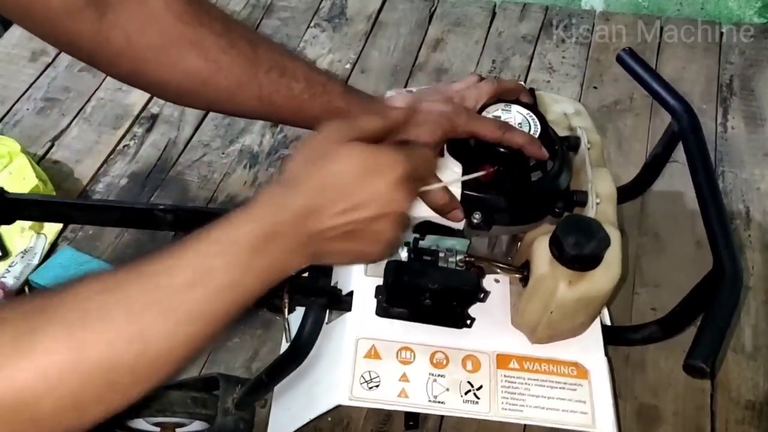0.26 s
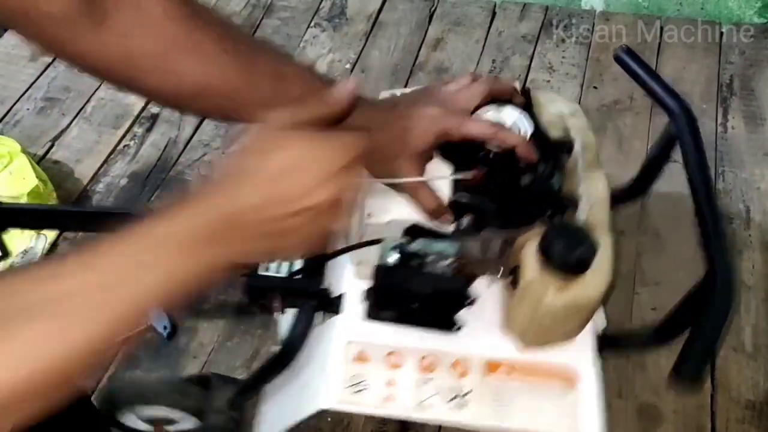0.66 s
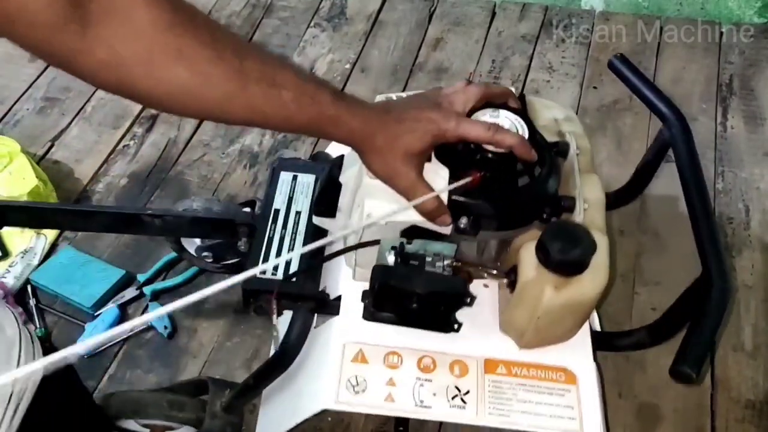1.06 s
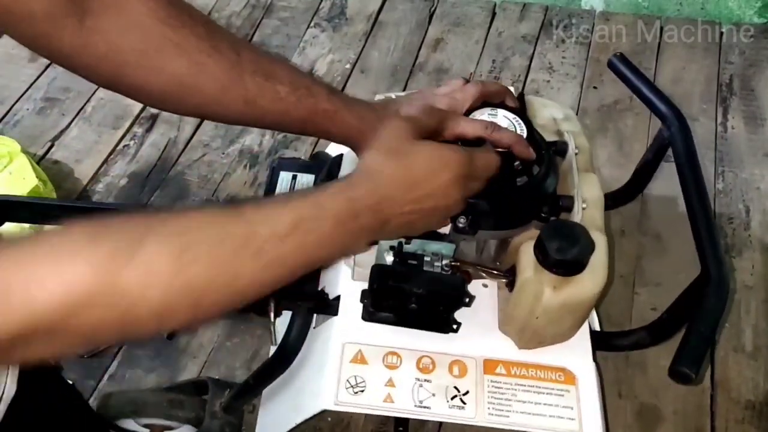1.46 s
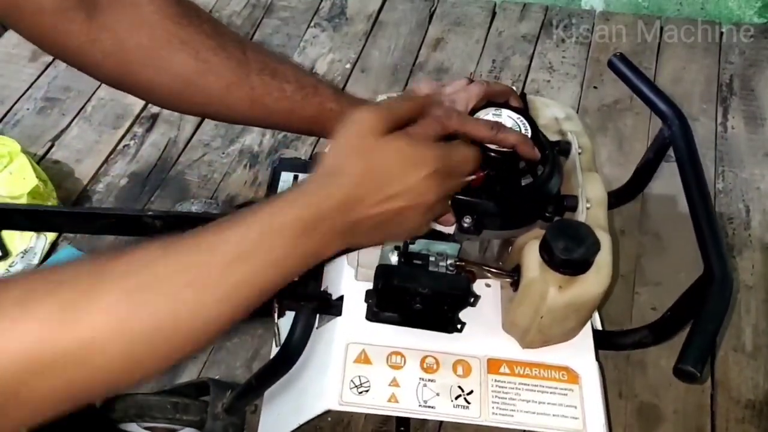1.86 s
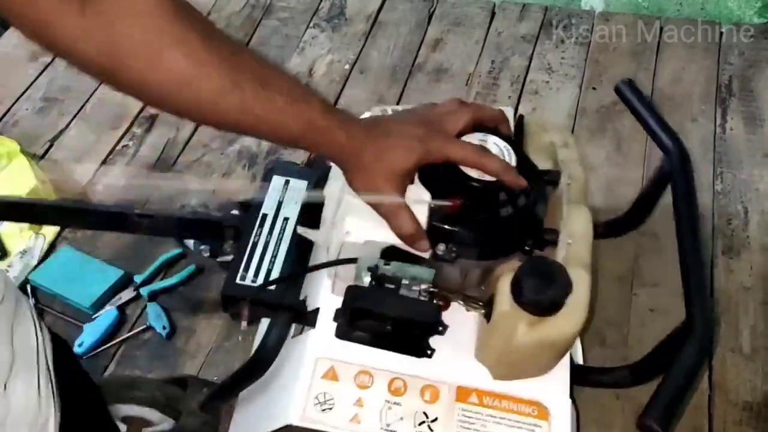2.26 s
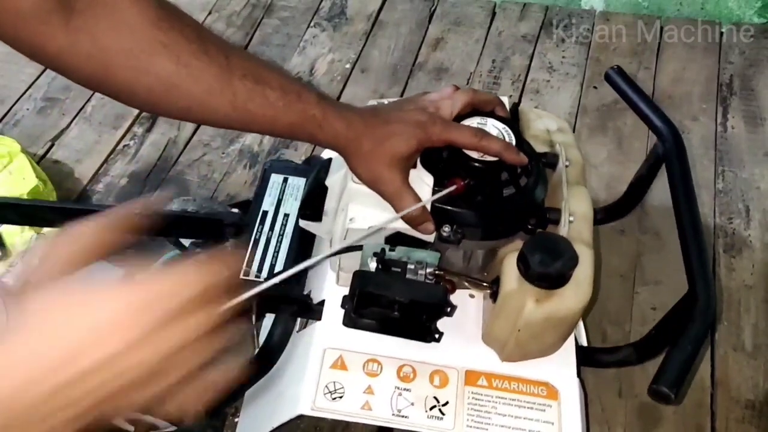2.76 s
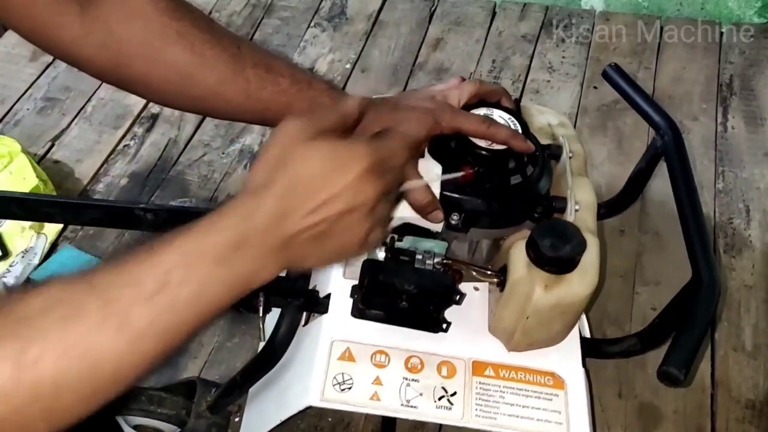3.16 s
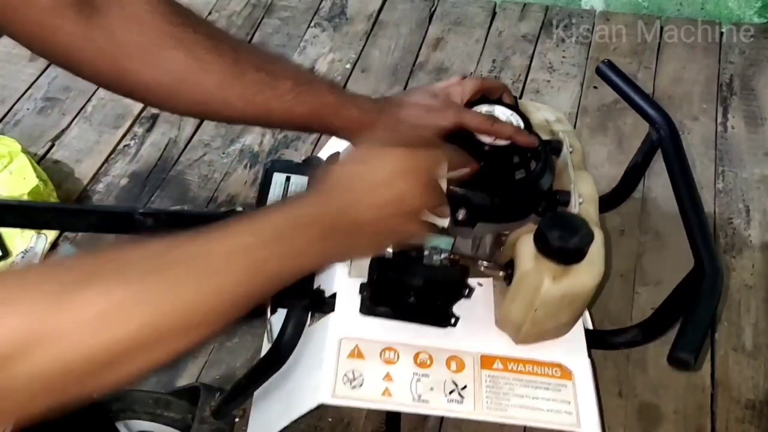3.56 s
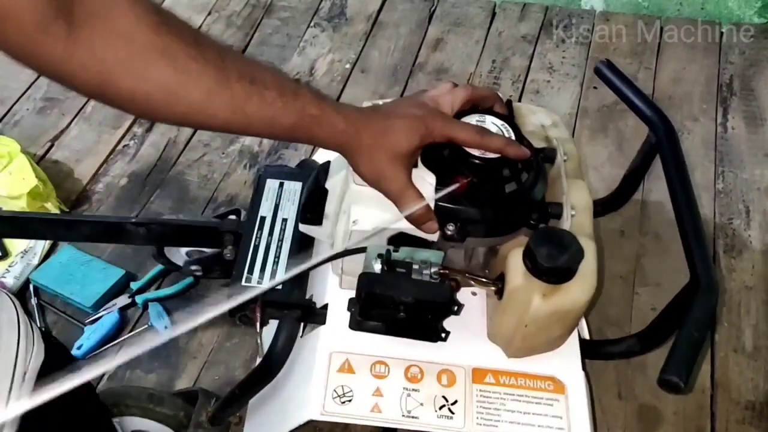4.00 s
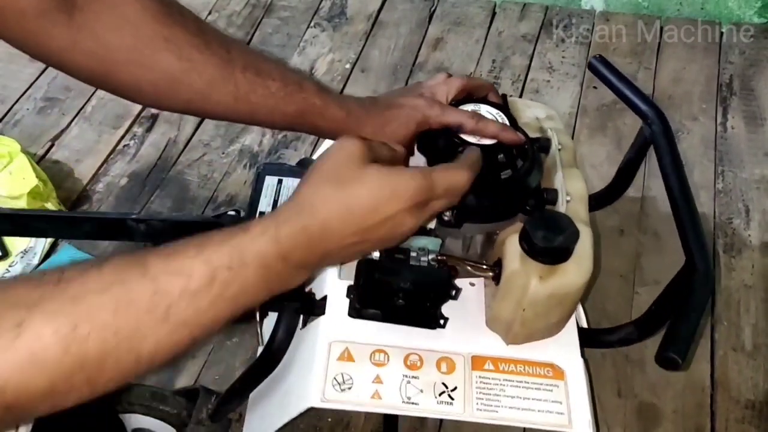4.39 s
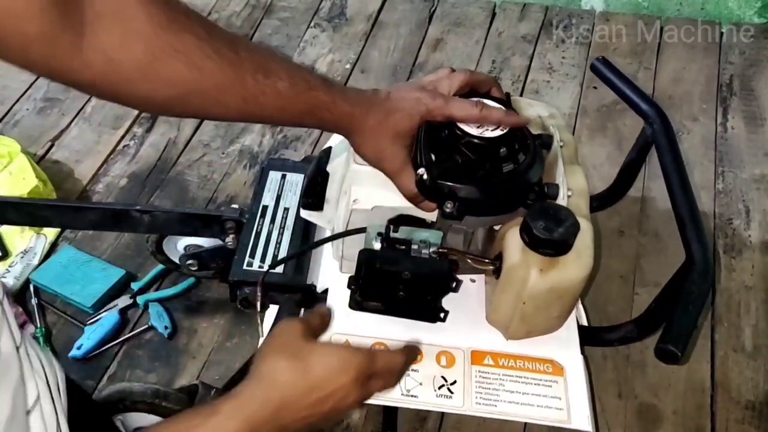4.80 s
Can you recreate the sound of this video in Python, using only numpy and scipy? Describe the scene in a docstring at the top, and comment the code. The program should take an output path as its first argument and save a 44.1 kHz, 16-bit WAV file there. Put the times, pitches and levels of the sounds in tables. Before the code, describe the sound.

Three hard rope pulls crank a small engine with quick popping thumps, rope hiss and loose rattles, ending in a sharp handle clack.

```python
"""In a workshop, a hand pulls the starter rope of a small two-stroke engine three times; it never fires.
Each puff of air is a pop and a thump, short swings of pressure that ring the frame.
Shaped noise gives the rope hiss, rattle and brushing reel; narrow noise gives the reel's squeal.
Pawl, handle and loose parts knock and rattle in the housing, as noise and clicks through ringing modes.
The tail of an earlier pull rings out at the start; the handle snaps home at the end."""
import sys
import numpy as np
from scipy import signal
from scipy.fft import rfft, irfft, next_fast_len
from scipy.io import wavfile
from scipy.ndimage import uniform_filter1d

SR = 44100
rng = np.random.default_rng(int(sys.argv[2]) if len(sys.argv) > 2 else 0)


def generate_wav(signal):
    """Clip the signal to [-1, 1] and save it as 16-bit WAV at the path in sys.argv[1]."""
    frames = np.transpose(np.atleast_2d(signal))
    scaled = np.clip(frames, -1, 1) * 32767
    pcm = np.round(scaled).astype(np.int16)
    wavfile.write(sys.argv[1], SR, pcm)


N = 222207  # length in samples


def amp(db):
    """Decibels to linear gain."""
    return 10 ** (np.asarray(db) / 20)


def evened(x):
    """Brings a sound to an RMS of one."""
    return x / np.sqrt(np.mean(x ** 2) + 1e-20)


def read(points, hz):
    """Reads a curve at any frequency, on a logarithmic frequency axis."""
    f, value = np.transpose(points)
    return np.interp(np.log(hz + 1), np.log(f + 1), value)


def add(mix, start_s, sound):
    """Lays a sound into the mix, cut off at the end."""
    part = mix[..., round(start_s * SR):][..., :sound.shape[-1]]
    part += sound[..., :part.shape[-1]]


def times(seconds):
    """Sample times [s] from zero."""
    return np.arange(round(seconds * SR)) / SR


def colour(x, points):
    """Shapes a sound by a spectrum in dB."""
    size = next_fast_len(x.shape[-1])
    gain = amp(read(points, np.fft.rfftfreq(size, 1 / SR)))
    return irfft(rfft(x, size) * gain, size)[..., :x.shape[-1]]


def ring(modes, seconds):
    """The answer of a body to one click: a sum of decaying sines."""
    t = times(seconds)
    return sum(amp(db - 60 * t / t60) * np.sin(2 * np.pi * hz * t) for hz, db, t60 in modes)


# how alike left and right are: (frequency [Hz], likeness [0-1])
LIKENESS = [(60, 1), (150, 0.96), (300, 0.92), (600, 0.58), (1200, 0.088), (3000, 0.018), (14000, 0.033)]


def spread(left, right):
    """Two unrelated sounds become a pair that is alike in the bass and unlike in the treble."""
    size = next_fast_len(len(left))
    same = np.clip(read(LIKENESS, np.fft.rfftfreq(size, 1 / SR)), 0, 1)
    a, b = rfft(left, size), rfft(right, size)
    return irfft(np.array([a, same * a + np.sqrt(1 - same ** 2) * b]), size)[:, :len(left)]


def gritty(per_s, scatter_db, smooth):
    """Friction: sparse uneven clicks over a share of smooth noise."""
    size = amp(scatter_db * np.minimum(rng.exponential(1, (2, N)), 3.5))
    size = size * rng.choice([-1., 1.], (2, N))
    clicks = size * (rng.random((2, N)) < per_s / SR)
    return spread(*evened(clicks + smooth * rng.standard_normal((2, N))))


# spectrum of the steady background air: (frequency [Hz], relative level [dB])
AIR_SPECTRUM = [(40, -40), (80, -14), (140, 0), (300, 10.5), (600, 0), (1200, -36), (3000, -11),
                (6000, -1.5), (16000, -53)]
AIR_DB = -58


def room_air():
    """Steady background noise, shaped by a spectrum."""
    noise = spread(*rng.standard_normal((2, N)))
    return amp(AIR_DB) * evened(colour(noise, AIR_SPECTRUM))


# how long the workshop echoes: (frequency [Hz], t60 [s])
SHOP_T60 = [(100, 0.83), (300, 0.33), (600, 0.39), (1400, 0.3), (4000, 0.29), (10000, 0.21)]


def shop(x):
    """Room echo: sparse taps of random sign, each band dying at its own speed."""
    taps = np.zeros((2, SR))
    at = np.arange(260, SR - 20, 20) + rng.integers(0, 20, (2, (SR - 261) // 20))
    np.put_along_axis(taps, at, rng.choice([-1., 1.], at.shape), 1)
    hz, t, bands = signal.stft(spread(*taps), SR, nperseg=256)
    bands = bands * amp(-60 * t / read(SHOP_T60, hz)[:, None])
    tail = signal.istft(bands, SR, nperseg=256)[1]
    # level out the echo energy, as long bands would otherwise get more
    size = next_fast_len(tail.shape[1])
    tail = irfft(rfft(tail, size) / np.sqrt(read(SHOP_T60, np.fft.rfftfreq(size, 1 / SR))), size)
    return signal.fftconvolve(x[None], tail / np.linalg.norm(tail[0]), axes=1)[:, :N]


# the reel brushes its cover: (time [s], length before the fade [s], level [dB])
SCRAPES = [(0.24, 0.033, -45.5), (0.707, 0.058, -41.5), (1.18, 0.061, -35), (1.534, 0.042, -28),
           (1.606, 0.044, -33.5), (1.758, 0.061, -41.5), (2.194, 0.04, -63), (3.018, .04, -48),
           (3.103, 0.066, -35.5), (3.212, 0.045, -33.5), (4.52, 0.035, -37), (4.61, 0.066, -35.5)]
# colour of the brushing: (frequency [Hz], relative level [dB])
SCRAPE_SPECTRUM = [(2500, -2), (4000, -2.5), (5500, 0.5), (6800, 2), (9000, -7.5), (13000, -5.5),
                   (16000, 5)]


def brushing():
    """The reel brushes its cover in short swells of thin hiss."""
    gain, t = np.zeros(N), times(.25)
    for s, length_s, db in SCRAPES:
        fade_db = 580 * np.maximum(t - length_s, 0)
        add(gain, s, amp(db - fade_db) * np.minimum(t / 0.0066, 1))
    return gain * evened(colour(gritty(1800, 3.4, 1.9), SCRAPE_SPECTRUM))


def surges(depth_db=3):
    """A gain that wanders unevenly, from noise smoothed twice over 16 ms."""
    wander = uniform_filter1d(uniform_filter1d(rng.standard_normal(N), size=700), size=700)
    return amp(depth_db * evened(wander))


def jolts():
    """A gain that jumps around each pop, when the engine shakes everything loose."""
    out, t = np.ones(N), times(.06)
    for s, *_ in PUFFS:
        add(out, max(s - .004, 0), 0.41 * np.exp(-t / 0.0062) * (1 - np.exp(-t / 0.0043)))
    return out


RATCHET_PER_S = 260


def ratchet():
    """Sparse taps of loose parts, each at the pitch of one or two upper modes of the housing."""
    size = amp(5.0 * np.minimum(rng.exponential(1, N), 3)) * (rng.random(N) < RATCHET_PER_S / SR)
    modes = [m for m in HOUSING if m[0] > 720]
    spot, side = rng.integers(0, len(modes), (2, N)), rng.random(N)
    pair = np.array([size * side, size * (1 - side)])
    taps = np.zeros((2, N))
    for k, (hz, *_) in enumerate(modes):
        struck = pair * (spot == k).any(0)  # either of two draws may pick this mode
        taps += signal.fftconvolve(struck, ring([(hz, 0, .014)], .05)[None])[:, :N]
    return evened(taps)


# one row a pull: (time the pawl bites [s], slack before the crank gives [s], time driven [s],
#   coasting fade against the usual [ratio], then relative strength of rope, loose parts, frame [dB])
PULLS = [(-.3, 0.054, 0.22, 0.95, 0, -1.5, 0.76), (1.134, 0.088, 0.24, 0.91, 2, -3, .2),
         (2.643, 0.061, 0.23, 0.85, 1.5, 2.5, 2.8), (4.106, 0.046, 0.3, 0.93, 0.5, -3.5, 0.37)]
BITE_S, GIVE_S = 0.048, 0.059  # rise as the pawl bites, rise as the crank gives


def pulled(driven_db, slack_db, rest_db, fade_db_per_s, rewind_db, rewind_db_per_s, order):
    """Gain of a rubbing part: low on the slack, full while driven, fading as it coasts and rewinds."""
    t, out = np.arange(N) / SR, amp(rest_db) * np.ones(N)
    for bite, slack, driven, brake, *strength_db in PULLS:
        give = np.clip((t - bite - slack) / GIVE_S, 0, 1)
        coast = brake * np.maximum(t - bite - slack - driven, 0)
        level_db = slack_db + (driven_db - slack_db) * give - fade_db_per_s * coast
        both = amp(level_db) + give * amp(rewind_db - rewind_db_per_s * coast)
        out += np.clip((t - bite) / BITE_S, 0, 1) * amp(strength_db[order]) * both
    return out


# colour of the rope over its guide: (frequency [Hz], relative level [dB])
HISS_SPECTRUM = [(1500, 10.5), (2500, 7.5), (3300, 6), (3900, 2.5), (4500, 6), (5800, 3), (6500, 6),
                 (7200, 3), (9000, 0), (12000, -2.5), (16000, 7)]
# colour of the loose parts, before the housing rings: (frequency [Hz], relative level [dB])
RATTLE_SPECTRUM = [(250, -47), (500, 8), (900, 6), (1500, 1.5), (2000, -10), (3000, -48), (5000, -40)]
# usual levels of rope, loose parts and shaking frame, one row each:
# (driven [dB], on the slack [dB], at rest [dB], coasting fade [dB/s], rewind [dB], rewind fade [dB/s])
ROPE_LEVELS = (-28.5, -36.5, -55, 67.5, -45.5, 66)
PARTS_LEVELS = (-30.5, -45, -55, 58.5, -42.5, 56)
SHAKE_LEVELS = (-21.5, -53, -57.5, 65, -43, 43)
RATCHET_DB = -9.5  # against the rattle


def rubbing():
    """Friction noise: rope over its guide, loose parts in the housing, and the frame shaking."""
    hiss = evened(colour(gritty(1500, 3.1, 1.56), HISS_SPECTRUM))
    rattle = colour(gritty(450, 1.05, 0.64), RATTLE_SPECTRUM)
    housing = signal.fftconvolve(rattle, ring(HOUSING, .2)[None])[:, :N]
    rattle = evened(rattle + amp(-41.5) * housing) + amp(RATCHET_DB) * ratchet()
    rumble = evened(signal.fftconvolve(gritty(300, 3.5, 0.3), ring(FRAME, .6)[None])[:, :N])
    jolt = jolts()
    rope = pulled(*ROPE_LEVELS, order=0) * hiss * jolt ** 0.36
    parts = pulled(*PARTS_LEVELS, order=1) * rattle * jolt * surges()
    return rope + parts + pulled(*SHAKE_LEVELS, order=2) * rumble


# the reel chirps on its post: (time [s], level [dB])
SQUEALS = [(1.232, -20), (1.286, -11.5), (1.331, -15), (1.346, -31), (1.375, -12), (1.390, -28),
           (1.422, -21), (1.455, -28), (4.192, -21.5), (4.288, -13.5), (4.314, -11), (4.340, -21),
           (4.370, -17), (4.405, -36)]
SQUEAL_HZ, SQUEAL_RISE_S, SQUEAL_T60_S = 13300, 0.0071, 0.14


def squeal():
    """A dry bearing sticks and slips: short bursts of narrow noise at one high pitch, nearer the left."""
    slip, t = np.zeros(N), times(.3)
    for s, db in SQUEALS:
        add(slip, s, amp(db - 60 * t / SQUEAL_T60_S) * (1 - np.exp(-t / SQUEAL_RISE_S)))
    pole = np.exp(-np.pi * 170 / SR)  # a narrow low-pass, then moved up to the squeal's pitch
    a, b = signal.lfilter([1], np.poly([pole, pole]), rng.standard_normal((2, 2, N)))
    carrier = np.exp(2j * np.pi * SQUEAL_HZ * np.arange(N) / SR)
    tone = evened(((a + 1j * b) * carrier).real * [[1], [.6]]) * slip
    return np.array([tone[0], tone[1] - 0.34 * tone[0]]) * amp([[1.0], [-4]])


# the pawl catches the metal cup:
# (time [s], level [dB], time until the cup is held still [s], extra on modes over 4 kHz [dB])
CATCHES = [(0.621, -46, 0.022, 0), (.645, -43, .02, -4), (0.6658, -36, 0.145, -9), (1.1353, -47, 0.08, -4),
           (2.1474, -44, 0.02, -4), (2.1674, -34.5, 0.13, -8), (3.631, -40, 0.03, 2),
           (3.6626, -33.5, 0.145, -1)]
# modes of the cup: (frequency [Hz], relative level [dB], t60 [s])
CUP_MODES = [(2580, 2, .11), (3343, 0, .38), (3352, -3.5, .22), (4490, -6, .45), (5992, -5, .14),
             (9335, -3, .1)]


def cup():
    """The metal cup rings after each catch until a touch damps it."""
    out, t = np.zeros(N), times(.4)
    for s, db, held_s, top_db in CATCHES:
        modes = [(hz, mode_db + top_db * (hz > 4000), t60) for hz, mode_db, t60 in CUP_MODES]
        damped = amp(db - 980 * np.maximum(t - held_s, 0))
        add(out, s, damped * ring(modes, .4) * (1 - np.exp(-t / 0.00053)))
    return out


CATCH_BODY_DB, CATCH_T60_S = 9.5, 0.11  # boom over the catch level, decay of the push


def boom():
    """Each catch shakes the low modes of the housing with a decaying push of noise."""
    out, t = np.zeros(N), times(.4)
    low_ring = ring([m for m in HOUSING if m[0] < 720], .3)
    for (s, db, *_), push in zip(CATCHES, rng.standard_normal((len(CATCHES), len(t)))):
        body = signal.fftconvolve(push * amp(-60 * t / CATCH_T60_S), low_ring)[:len(t)]
        add(out, s, amp(db + CATCH_BODY_DB) * body / abs(body).max())
    return out


# pawl, handle and loose parts knock and rattle: (time [s], relative level [dB], pitch [Hz],
#   tick against the knock [dB], t60 of the clatter, at least 0.01 in the body [s])
KNOCKS = [(.032, -9, 833, -9.5, 0.052), (0.041, -22, 2500, 3, 0.015), (0.044, -18, 660, -5.5, 0.14),
          (0.057, -20, 1420, -3, 0.097), (0.137, -29, 870, -24, 0.024), (0.243, -30.5, 647, -16, 0.32),
          (0.533, -21.5, 860, -24, 0.045), (.540, -27.5, 960, -35, 0.025), (.546, -27.5, 890, -35, 0.041),
          (.555, -31, 766, -35, 0.025), (.618, -35, 980, -6, 0.09), (0.645, -18, 530, -7.5, 0.053),
          (.664, -18.5, 670, -3.5, 0.038), (.704, -32, 460, -25, 0.037), (.855, -30, 950, -3, 0.023),
          (0.983, -23.5, 840, -48, 0.02), (1.006, -24.5, 706, -45, 0.055), (1.095, -31.5, 746, -65, 0.042),
          (1.136, -17, 730, -16.5, 0.058), (1.241, -19, 1355, 0, 0.057), (1.303, -20, 1415, -14, 0.02),
          (1.394, -17.5, 1190, -22, 0.034), (1.415, -11.5, 875, -9.5, 0.08), (1.443, -18, 1750, -10, 0.039),
          (1.483, -21.5, 1980, -25, 0.034), (1.561, -22.5, 885, -29, 0.017), (1.649, -20.5, 695, -41, 0.21),
          (1.744, -27, 985, -26, 0.27), (2.022, -22.5, 880, -16, 0.033), (2.127, -33.5, 740, -2, 0.054),
          (2.145, -21.5, 560, -5, 0.051), (2.170, -19.5, 933, -2.5, 0.067), (2.2, -29, 574, -31, 0.26),
          (2.344, -34, 830, -12, 0.044), (2.363, -37, 1060, -4.5, 0.056), (2.515, -23.5, 1076, -49, 0.011),
          (2.523, -25, 684, -31, 0.11), (2.645, -15, 943, -9.5, 0.066), (2.711, -23.5, 760, -2.5, 0.043),
          (2.741, -23, 705, -28, 0.072), (2.757, -12.5, 740, -11.5, 0.21), (2.799, -14.5, 1650, -20, 0.049),
          (2.815, -15, 1310, -20, 0.068), (2.907, -14.5, 1730, -35, 0.031), (2.949, -15, 856, -27, 0.049),
          (2.956, -16, 1820, -25, 0.018), (3.002, -28, 1290, -25, 0.024), (3.063, -21, 916, -30, 0.019),
          (3.177, -25, 1496, -21, 0.041), (3.264, -21, 906, -17, 0.04), (3.519, -28.5, 786, -27, 0.0077),
          (3.593, -32, 880, -71, 0.028), (3.634, -17, 925, -7, 0.087), (3.660, -19, 885, -4, 0.082),
          (3.836, -39.5, 620, -5, 0.057), (3.864, -38.5, 680, 1.5, 0.036), (3.998, -27.5, 746, -18, 0.015),
          (4.067, -40, 640, -30, .02), (4.075, -29, 780, -21, 0.11), (4.107, -12, 920, -8.5, 0.038),
          (4.109, -30, 1010, -13, 0.025), (4.125, -28, 610, -3, 0.055), (4.183, -23, 1490, 1, 0.072),
          (4.254, -20, 1180, -25, .03), (4.295, -14.5, 1170, -17, 0.047), (4.308, -19, 557, -23, 0.033),
          (4.359, -10, 770, -9, 0.045), (4.385, -13.5, 543, -14, 0.1), (4.399, -13.5, 1500, -13, 0.1),
          (4.428, -21, 1990, -23, 0.043), (4.555, -16, 926, -25, 0.008), (4.582, -28, 1690, -31, 0.035),
          (4.648, -20, 806, -18, 0.082), (4.899, -9, 940, -13.5, 0.065), (4.911, -22, 690, -15, 0.11)]
# modes of the housing: (frequency [Hz], relative level [dB], t60 [s])
HOUSING = [(308, -9.5, 0.15), (414.7, -0.5, .1), (453, -7.5, 0.19), (507, -2, 0.16), (610, -7, 0.2),
           (662.3, -8.5, 0.18), (778, -9.5, 0.09), (984, 4, 0.027), (1143, -1.5, 0.03), (1440, -2, 0.028),
           (1695, 3.5, 0.013), (1970, -3, 0.028), (2600, -6, 0.018)]
# colour of the tick: (frequency [Hz], relative level [dB])
TICK_SPECTRUM = [(1000, -4), (2500, 2), (4000, -1.5), (6000, 3.5), (9000, -2), (12000, -3.5), (16000, 4)]
TICK_LEAD_S, TICK_RISE_S = .004, 0.0024  # the tick swells in a few ms around each blow
KNOCK_TOP, KNOCK_RISE_S = 1.85, 0.0004  # top edge of the snap over its pitch, rise of the blow
KNOCK_LEFT_DB, KNOCK_RING_DB = 0.5, -2  # left over right, housing under the snap
NEAR_DB_PER_OCTAVE = 8  # a blow wakes most the modes near its own pitch


def knocks():
    """Each blow is a note and a dry snap at its own pitch, an uneven ring of the housing and a tick."""
    out, t = np.zeros((2, N)), times(.4)
    seeds = rng.standard_normal((len(KNOCKS), 3, len(t)))
    spots = rng.standard_normal((len(KNOCKS), len(HOUSING)))
    lean = amp([[KNOCK_LEFT_DB / 2], [-KNOCK_LEFT_DB / 2]])
    for (s, db, hz, tick_db, t60), (noise, *pair), spot in zip(KNOCKS, seeds, spots):
        fade = amp(-60 * t / max(t60, .01))
        # a click, a short crack, then loose parts
        clatter = 14 * (t == 0) + noise * (fade + 1.2 * amp(-60 * t / 0.018))
        band = signal.butter(2, [hz * .65, hz * KNOCK_TOP], "band", fs=SR, output="sos")
        snap = signal.sosfilt(band, clatter)
        note = ring([(hz, 0, .028), (hz * 1.7, -5, .012), (hz * 2.9, -9, .008)], .4)
        # every blow lands on another spot, so the modes come in other shares
        modes = [(f, mode_db + 2 * k - NEAR_DB_PER_OCTAVE * abs(np.log2(f / hz)), ring_s)
                 for (f, mode_db, ring_s), k in zip(HOUSING, spot)]
        body = signal.fftconvolve(clatter, ring(modes, .2))[:len(t)]
        blow = snap / abs(snap).max() + note + amp(KNOCK_RING_DB) * body / abs(body).max()
        grit = np.array(pair) * (fade ** 0.49 + 0.041 * amp(-60 * t / 0.0075))
        tick = colour(grit + 0.014 * grit[::-1], TICK_SPECTRUM)  # a trace of each side in the other
        tick = tick * (1 - np.exp(-(t / TICK_RISE_S) ** 2))
        add(out, s, amp(db) * 0.77 * blow * (1 - np.exp(-t / KNOCK_RISE_S)) * lean)
        add(out, s - TICK_LEAD_S, amp(db + tick_db) * tick * lean)
    return out


# the handle snaps home and chatters: (time [s], peak level [dB])
HOME_CONTACTS = [(4.8998, -5), (4.9033, -6), (4.9085, -11), (4.9165, -16), (4.9245, -12)]
# modes of the handle: (frequency [Hz], relative level [dB], t60 [s])
HANDLE_MODES = [(520, -7, .07), (670, -9, .06), (840, -9, .05), (1170, -8, .03), (1440, -4, .025),
                (1660, 2, .016), (1980, -5, .025), (2160, -7, .025), (2430, 0, .018), (2640, 3, .02),
                (2930, -6, .02)]


def home():
    """Each contact is a hard push of about a ms with fading noise that rings the handle."""
    t, out = times(.1), np.zeros(N)
    for (s, db), noise in zip(HOME_CONTACTS, rng.standard_normal((len(HOME_CONTACTS), len(t)))):
        hit = 3 * np.cos(2 * np.pi * 1900 * t) * np.sin(np.pi * np.minimum(t / .0012, 1))
        push = hit + noise * (amp(-60 * t / 0.015) + 0.25 * amp(-60 * t / 0.09))
        clack = signal.fftconvolve(push, ring(HANDLE_MODES, .1))[:len(t)]
        add(out, s, amp(db) * clack / abs(clack).max())
    return out


PUFF_LEAD_S = .02


def puff(hz, cycles):
    """A short swing of pressure with suction in the middle, which falls 20 ms in."""
    half = round(PUFF_LEAD_S * SR)
    t = np.arange(-half, half) / SR
    return -np.cos(2 * np.pi * hz * t) * np.exp(-.5 * (t * hz / cycles) ** 2)


# one row a puff of air:
# (time [s], pop as the port opens [dB], thump of the air swinging back [dB])
PUFFS = [(-.04, -20, -14), (-.005, -21, -16.5), (0.036, -41, -12.5), (0.084, -24, -18),
         (1.245, -10.5, -7.5), (1.306, -6, -7.5), (1.351, -8, -3.5), (1.394, -3.5, -4.5),
         (1.436, -5.5, -4.5), (1.483, -10, -7), (1.528, -32, -41), (1.567, -20, -17), (1.617, -38, -35),
         (1.655, -19, -17.5), (2.761, -8, -8), (2.8, -9, -10), (2.827, -7, -13.5), (2.867, -10.5, -6),
         (2.908, -4, -5), (2.95, -6.5, -8), (2.997, -17, -16.5), (3.022, -36, -18), (3.067, -15, -15),
         (3.156, -21, -17), (4.172, -30, -18.5), (4.194, -11.5, -9.5), (4.221, -35, -16),
         (4.253, -9.5, -7.5), (4.299, -7.5, -7), (4.336, -7, -4), (4.378, -9, -5.5), (4.436, -9, -10),
         (4.483, -13, -21), (4.531, -17, -16.5), (4.584, -19, -16.5)]
# muffler, frame and floor boards ring on after each puff: (frequency [Hz], relative level [dB], t60 [s])
FRAME = [(80.1, -7, 1), (98, 5, 0.12), (156.4, 6, 0.13), (200.5, 5, 0.075), (274, 2, 0.054),
         (302, -5, 0.16), (369, -3, 0.092), (458.6, -5, 0.081), (517, -5, 0.2), (640, -31, 0.39)]
POP_HZ, THUMP_HZ, SWING_BACK_S = 286, 187.7, 0.01683  # the thump follows the pop by the swing back
QUICK_GAP_S, LURCH = 0.045, 1.56  # a longer gap between puffs rocks the frame harder, by this power


def engine():
    """Every puff pops as the port opens and thumps as the air swings back; the frame rings behind."""
    early = round(SR / 10)  # room for puffs just before the start
    air, rock, last = np.zeros(N + early), np.zeros(N + early), -1
    for s, pop_db, thump_db in PUFFS:
        slow = max((s - last) / QUICK_GAP_S, 1) if s - last < .2 else 1
        # weak thumps are drawn out
        thump = amp(thump_db) * puff(THUMP_HZ, cycles=0.44 + 0.02 * max(-10.5 - thump_db, 0))
        start_s = s + early / SR - PUFF_LEAD_S
        add(air, start_s, amp(pop_db) * puff(POP_HZ, cycles=0.22))
        add(air, start_s + SWING_BACK_S, thump)
        add(rock, start_s + SWING_BACK_S, (slow ** LURCH - 1) * thump)
        last = s
    frame = signal.fftconvolve(air + rock, ring(FRAME, .6))[:N + early]
    return (air + amp(-59.5) * frame)[early:]


def scene():
    """Mixes all layers; puffs, blows and the handle's snap also feed the workshop echo."""
    puffs, blows, snap = engine(), knocks() + boom(), home()
    echo = shop(amp(-4.0) * puffs + amp(1.0) * blows.mean(0) + amp(-4) * snap)
    metal = amp([[1.5], [-1.5]]) * cup()  # a little to the left
    return puffs + blows + snap + echo + metal + rubbing() + brushing() + squeal() + room_air()


# tilt between the sides: (frequency [Hz], left over right [dB])
LEFT_TILT = [(100, -1), (1000, 0.5), (5000, 1), (10000, 2.5), (15000, 3)]
# response of the microphones: (frequency [Hz], gain [dB])
MIC_RESPONSE = [(20, -22), (45, -19.5), (80, -10.5), (120, -1.5), (12000, -0.5), (14000, -7.5),
                (16000, -21)]
EDGE_HZ = 16200


def record(dry):
    """The microphones lose deep bass and top, the left port hears more treble; then the band limit."""
    left = colour(dry[0], [(f, db / 2) for f, db in LEFT_TILT])
    right = colour(dry[1], [(f, -db / 2) for f, db in LEFT_TILT])
    heard = colour(np.array([left, right]), MIC_RESPONSE)
    band = signal.firwin(511, EDGE_HZ, window=("kaiser", 9), fs=SR)
    return signal.oaconvolve(heard, band[None], "same")


dry = scene()
out = record(dry)
generate_wav(out)
```